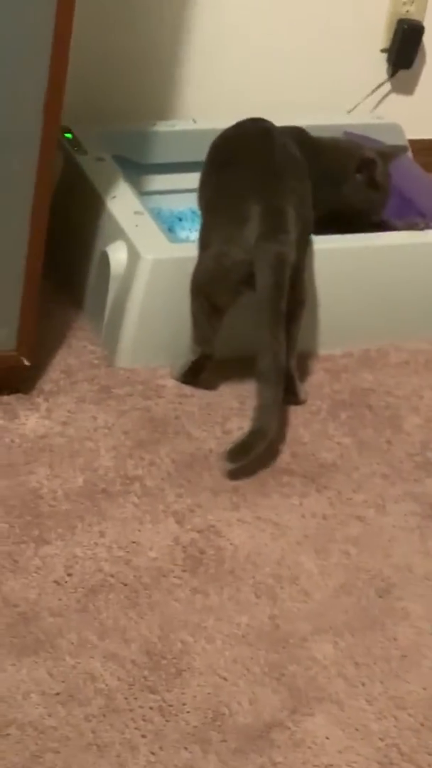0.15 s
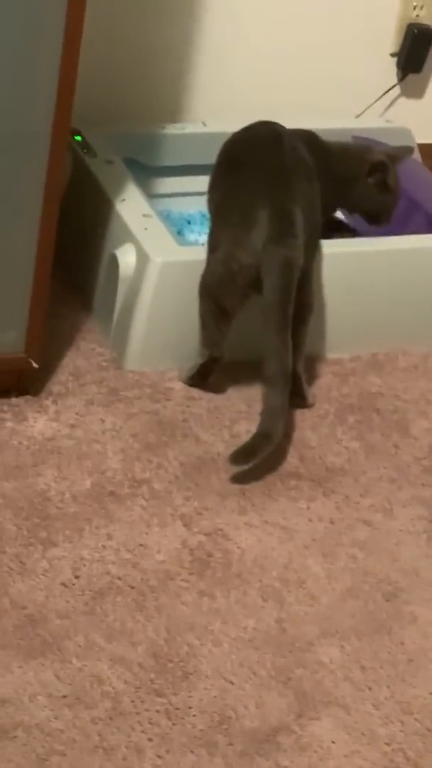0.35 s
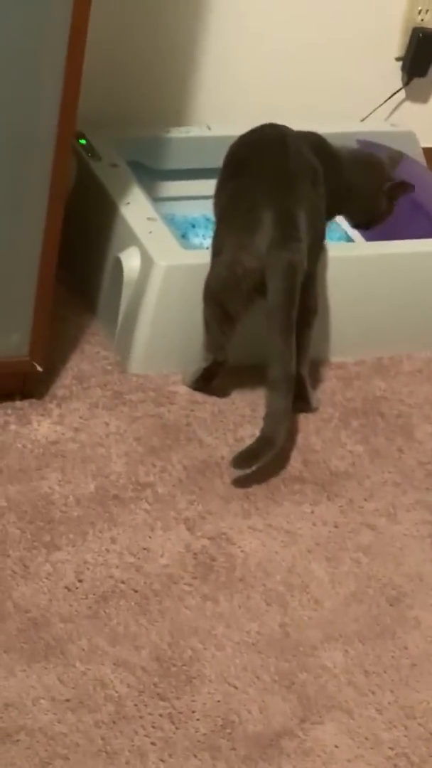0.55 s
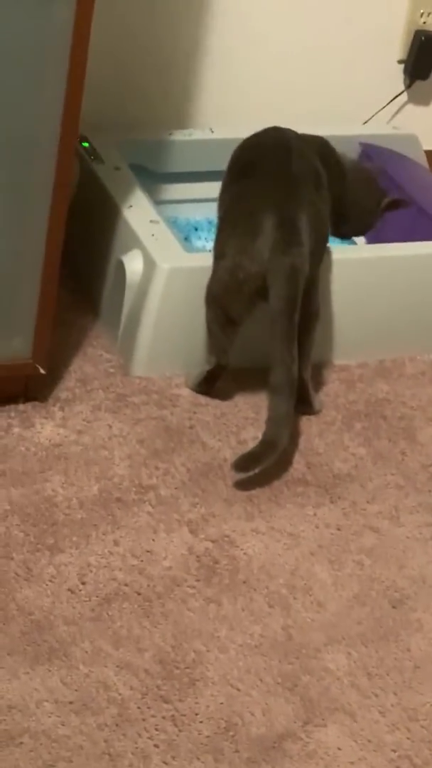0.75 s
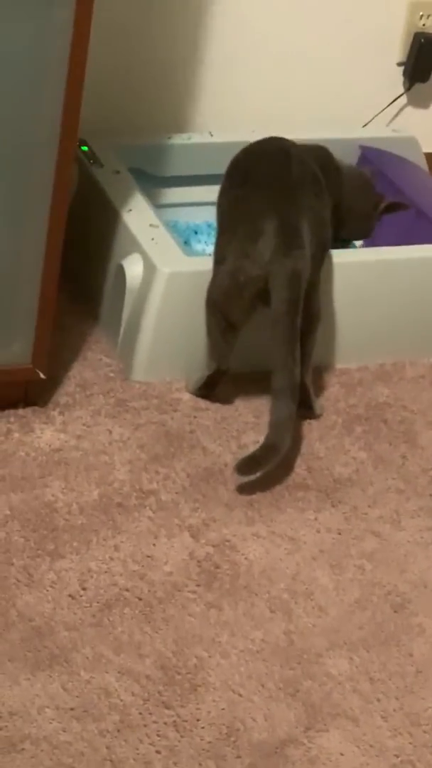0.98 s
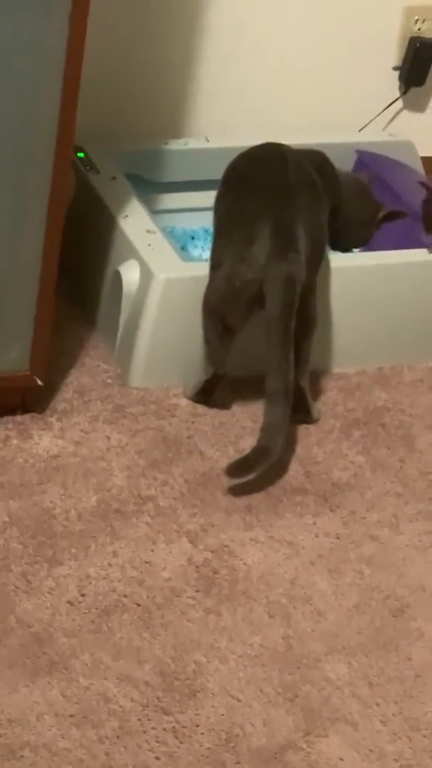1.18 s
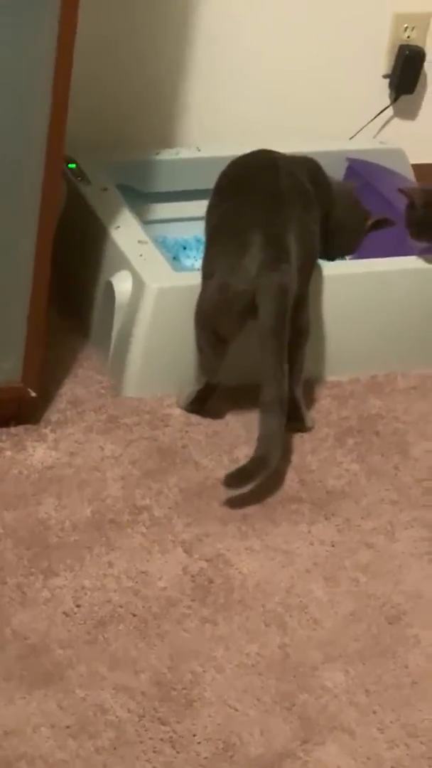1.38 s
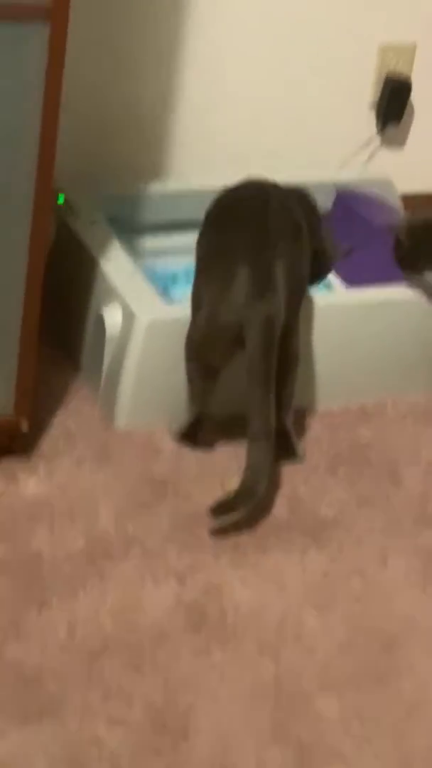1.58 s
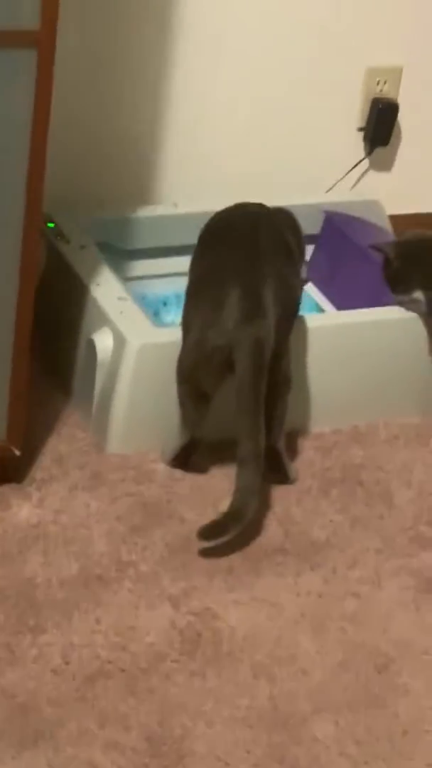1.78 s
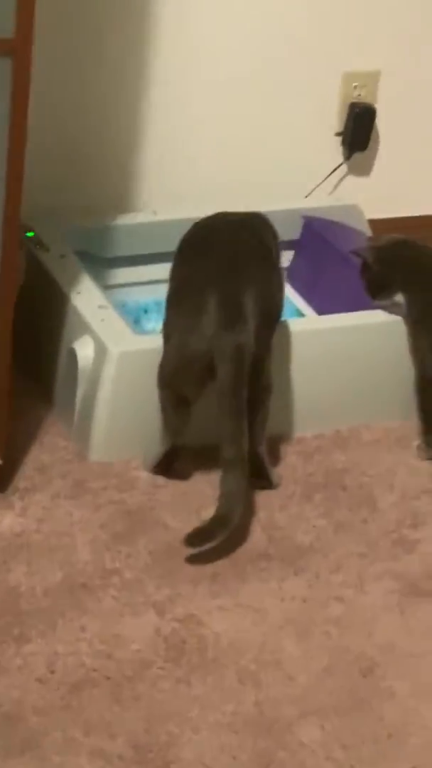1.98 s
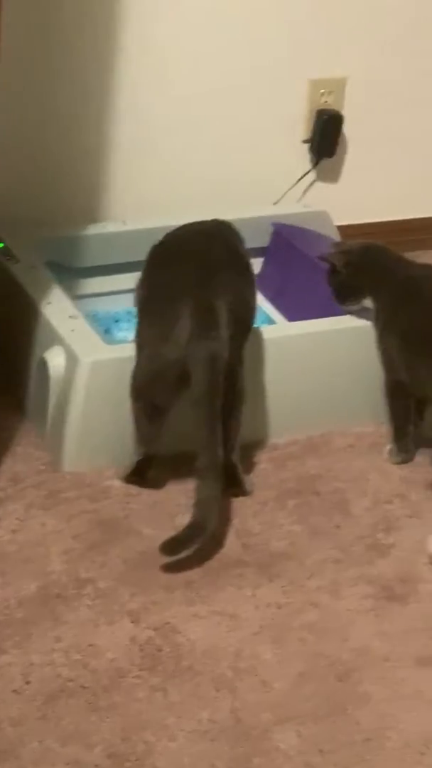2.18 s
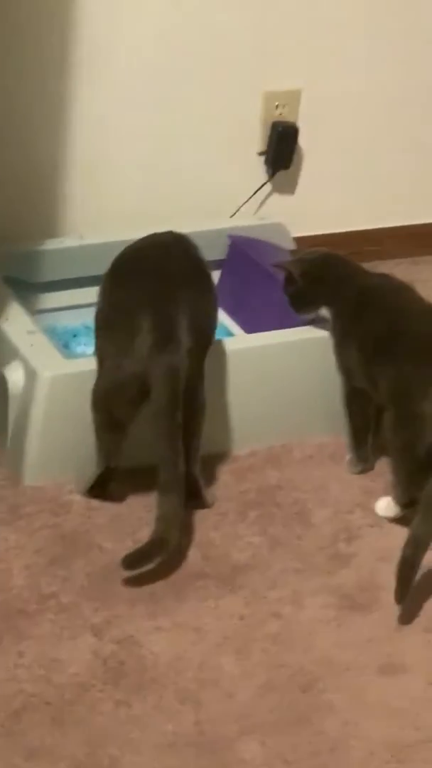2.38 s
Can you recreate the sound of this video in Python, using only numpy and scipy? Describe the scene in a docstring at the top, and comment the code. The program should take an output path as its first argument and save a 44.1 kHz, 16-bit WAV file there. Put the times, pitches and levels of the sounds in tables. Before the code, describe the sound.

Gritty litter crystals scrape and rattle under a cat's paw in a humming room.

```python
"""Small carpeted room: a couple of metres away, a cat paws at crystal litter in a plastic box.
A few light touches scatter crystals, then come a short hard scrape, a longer sweep and a faint touch.
Colliding crystals click; in the two strokes the clicks ring the box, and claws knock its wall.
Mains hum and a low rumble run throughout."""
import sys
import numpy as np
from scipy import signal
from scipy.fft import rfft, irfft
from scipy.io import wavfile

SR = 44100
rng = np.random.default_rng(int(sys.argv[2]) if len(sys.argv) > 2 else 0)


def file_out(sig):
    """Save sig as 16-bit WAV at sys.argv[1]."""
    # one column per channel
    cols = np.atleast_2d(sig).T
    # limit, then scale
    lim = np.clip(cols, -1, 1)
    pcm = np.round(lim * 32767).astype(np.int16)
    wavfile.write(sys.argv[1], SR, pcm)


N = 112014
HZ = np.fft.rfftfreq(N, 1 / SR)
TIME = np.arange(N) / SR


def amp(db):
    """Decibels to gain."""
    return 10 ** (np.asarray(db) / 20)


def unit_rms(x):
    """Scale to rms 1."""
    return x / np.sqrt(np.mean(abs(x) ** 2) + 1e-20)


def curve_at(points, hz):
    """Interpolate a table over log frequency."""
    freq_hz, value = np.transpose(points)
    return np.interp(np.log(hz + 1), np.log(freq_hz), value)


def drift(rate_hz):
    """Slow random motion, rms 1."""
    return unit_rms(irfft(rfft(rng.standard_normal(N)) * np.exp(-(HZ / rate_hz) ** 2), N))


# freq_hz, density_db
RUMBLE_SPECTRUM = [(10, -31), (22, -38), (32, -9.5), (48, -1.5), (62, 6.5), (80, -9), (97, 0), (135, -6.5),
                   (165, -6.5), (245, -9.5), (320, -12.5), (430, -19), (680, -23.5), (850, -20),
                   (1100, -29), (1400, -22.5), (2000, -35.5), (3000, -43.5), (7000, -52), (9000, -48),
                   (15000, -51)]

def rumble(level_db=-54, swell_db=2.53, swell_hz=11):
    """Low room noise, each octave swelling on its own, under a faint steady hiss."""
    noise = unit_rms(irfft(rfft(rng.standard_normal((2, N))) * amp(curve_at(RUMBLE_SPECTRUM, HZ)), N))
    spectrum = rfft(noise)
    octave = np.log2(np.clip(HZ, 2 ** 5, 2 ** 12))
    out = np.zeros((2, N))
    for k in range(5, 13):
        band = irfft(spectrum * np.maximum(1 - abs(octave - k), 0), N)
        out += band * amp(level_db + swell_db * drift(swell_hz) * (k < 12))
    return out


# pitch_hz, relative_db
HUM_LINES = [(60, -20), (120, 0), (240, -15.5), (557, -28.5)]
# time_s, level_db
HUM_ENVELOPE = [(0.0, -51), (0.54, -52), (0.57, -55.5), (0.8, -49), (0.83, -53.5), (1.51, -49.5),
                (1.56, -58), (1.6, -47), (1.65, -63), (1.68, -53), (1.85, -48), (1.92, -56.5), (2.21, -51),
                (2.23, -54), (2.48, -49), (2.54, -50.5)]
# freq_hz, left_minus_right_db (also used by microphones)
BALANCE = [(30, -2), (60, 0.5), (120, -4.5), (220, -4), (380, -1.5), (700, 2.5), (1500, -0.6), (3000, 0.2),
           (4100, 0.2), (6000, -3), (8000, -0.2), (15000, -0.5)]

def hum(waver_db=0.84, waver_rad=0.74, waver_hz=14, left_lag_rad=0.44):
    """Mains hum of an appliance, slightly right; level and phase waver."""
    out = np.zeros((2, N))
    swell_db = np.interp(TIME, *np.transpose(HUM_ENVELOPE))
    sides = np.array([[.5], [-.5]])
    for hz, db in HUM_LINES:
        phase = 2 * np.pi * (hz * TIME + rng.random()) + waver_rad * drift(waver_hz)
        level = amp(swell_db + db + waver_db * drift(waver_hz) + sides * curve_at(BALANCE, hz))
        out += np.sqrt(2) * level * np.sin(phase - sides * left_lag_rad)
    return out


def crystals(clicks_per_s, spread_db=2):
    """Crystals collide: random clicks of uneven size."""
    size = amp(spread_db * np.minimum(rng.exponential(1, N), 4))
    return unit_rms(size * rng.choice([-1., 1.], N) * (rng.random(N) < clicks_per_s / SR))


def treble_shelf(x, treble_db, corner_hz=6500):
    """High shelf; the gain may vary in time."""
    treble = irfft(rfft(x) * (1 - 1 / (1 + (HZ / corner_hz) ** 4)), N)
    return x + treble * (amp(treble_db) - 1)


# start_s, rise_s, length_s, level_db, treble_db
PAW_TOUCHES = [(0.021, 0.0012, 0.014, -52, 1), (.112, 0.0055, 0.016, -63, -9),
               (0.165, 0.0073, 0.025, -49, -9.5), (0.21, 0.0052, 0.027, -57, -24),
               (0.242, .002, 0.0045, -49, -8.5), (0.251, 0.007, 0.03, -49.5, -18),
               (2.067, 0.014, 0.015, -72, -12)]
# freq_hz, density_db
TOUCH_SPECTRUM = [(150, -27), (500, -6), (850, -9.5), (1200, -8.5), (2500, -7), (3700, -6.5), (4500, -12.5),
                  (7300, -13.5), (9000, -9.5), (14000, -12), (16000, -18)]

def touches(fall_s=0.0067, crack_db=0.5, crack_s=0.0028):
    """Light paw touches: the first crystals crack loudest, then a few tumble."""
    clicks = np.zeros(N)
    for start_s, rise_s, length_s, level_db, treble_db in PAW_TOUCHES:
        t = TIME - start_s
        tumble = np.clip(t / rise_s, 0, 1) * np.exp(-np.maximum(t - length_s, 0) / fall_s)
        crack = 1 + amp(crack_db) * np.exp(-abs(t) / crack_s)
        clicks += treble_shelf(crystals(clicks_per_s=2000) * tumble * crack * amp(level_db), treble_db)
    return irfft(rfft(room(clicks)) * unit_rms(amp(curve_at(TOUCH_SPECTRUM, HZ))), N)


# pitch_hz, t60_s, scrape_db, sweep_db
BOX_MODES = [(520, .13, -8, 2), (1005, .2, 9, 4), (1230, .15, 6, -2), (1485, .15, 3, 4), (1822, .3, -5, 9),
             (1986, .22, -5, 8), (2372, .16, -6, 5), (2590, .14, 10, -8), (2940, .12, -10, 0),
             (3020, .13, 6, -12), (3280, .12, 2, -2), (3850, .12, 0, -7)]

def box_response(spot):
    """Modes of the plastic walls, driven at spot 0 (scrape) or 1 (sweep)."""
    return sum(amp(levels_db[spot]) / (1 + 1j * (HZ - hz) * 2 * np.pi * t60_s / np.log(1000))
               for hz, t60_s, *levels_db in BOX_MODES)


def paw_drag(pressure, spectrum, spot, body_rise_s, body_hz=2060, ring_db=-5):
    """Dense clicks ring the box; their low body builds as the paw sinks in."""
    time_s, level_db, treble_db = np.transpose(pressure)
    level = amp(np.interp(TIME, time_s, level_db)) * (TIME > time_s[0]) * (TIME < time_s[-1])
    clicks = treble_shelf(crystals(clicks_per_s=16000) * level, np.interp(TIME, time_s, treble_db))
    body = irfft(rfft(clicks) / (1 + (HZ / body_hz) ** 8), N)
    depth = np.clip((TIME - time_s[0]) / body_rise_s, 0, 1) ** 2
    clicks -= body * (1 - depth)
    colour = amp(curve_at(spectrum, HZ)) * (1 + amp(ring_db) * box_response(spot))
    return irfft(rfft(room(clicks)) * unit_rms(colour), N)


# time_s, level_db, treble_db
SCRAPE_PRESSURE = [(.305, -63, -2), (.321, -41, -14), (.328, -38, -2), (.338, -43.5, 6), (.346, -39.5, 3),
                   (.372, -38, -1), (.399, -39.5, -14), (.41, -52, 12.5), (.45, -61, -10), (.52, -76, -12)]
# freq_hz, density_db
SCRAPE_SPECTRUM = [(200, -26), (750, -19), (1050, -7.5), (2100, -2.5), (2700, 0.5), (3800, 1), (4600, -9),
                   (5800, -10), (7400, -19.5), (9000, -14), (14000, -21.5), (16000, -23)]

def scrape():
    """Short hard drag through the litter."""
    return paw_drag(SCRAPE_PRESSURE, SCRAPE_SPECTRUM, spot=0, body_rise_s=0.052)


# start_s, level_db, pitch_hz
CLAW_KNOCKS = [(.346, -38, 3050), (.373, -31, 2640), (1.263, -44, 1990), (1.317, -45.5, 1774)]

def knocks(rise_s=0.004, spread_octaves=0.15):
    """A claw strikes the wall; modes near that spot's pitch ring on."""
    out = np.zeros((2, N))
    for start_s, level_db, pitch_hz in CLAW_KNOCKS:
        t = np.maximum(TIME - start_s, 0)
        for hz, t60_s, *_ in BOX_MODES:
            share = np.exp(-(np.log2(hz / pitch_hz) / spread_octaves) ** 2)
            if share > .05:
                swing = np.sin(2 * np.pi * (hz * t + rng.random((2, 1))))
                out += share * amp(level_db - 60 * t / t60_s) * np.minimum(t / rise_s, 1) * swing
    return out


# time_s, level_db, treble_db
SWEEP_PRESSURE = [(1.075, -76, -15), (1.1, -56, -12), (1.125, -48.5, -8), (1.148, -57, 2),
                  (1.158, -48, -1.5), (1.215, -47.5, 0.5), (1.252, -43, 1.5), (1.266, -39.5, -7),
                  (1.288, -50.5, 6.5), (1.32, -46.5, 1.5), (1.365, -51, 1), (1.41, -74, 14),
                  (1.46, -77.5, 6), (1.56, -82.5, 8.5)]
# freq_hz, density_db
SWEEP_SPECTRUM = [(150, -22), (500, -4), (700, -6), (1100, -2.5), (1800, 0.5), (3100, 3.5), (4700, -4.5),
                  (7400, -8), (9000, -7.5), (13000, -12), (16000, -21)]

def sweep():
    """Longer, softer drag through the litter."""
    return paw_drag(SWEEP_PRESSURE, SWEEP_SPECTRUM, spot=1, body_rise_s=0.011)


def early_reflections(x, count=12, span_s=0.012):
    """First returns from the box and the wall behind it."""
    out = np.zeros((2, N))
    for side in out:
        for when, sign in rng.random((count, 2)):
            lag = round(when * span_s * SR)
            side[lag:] += np.sign(sign - .5) * x[:N - lag] / np.sqrt(count)
    return out


# freq_hz, t60_s
ROOM_DECAY = [(200, 0.12), (1000, .38), (3000, 0.29), (6000, .3), (10000, 0.18), (16000, 0.25)]

def reverb(x, taps_per_s=5000):
    """Two independent tails of sparse reflections; each band decays at its own rate."""
    taps = rng.choice([-1., 1.], (2, SR // 2)) * (rng.random((2, SR // 2)) < taps_per_s / SR)
    hz, t, bands = signal.stft(taps, SR, nperseg=256)
    decay = amp(-60 * t / curve_at(ROOM_DECAY, hz)[:, None])
    tail = signal.istft(bands * decay, SR, nperseg=256)[1]
    tail /= np.linalg.norm(tail, axis=1, keepdims=True)
    return signal.fftconvolve(x[None], tail, axes=1)[:, :N]


def room(x, direct_db=-6, early_db=-8.5, crossfade_hz=9):
    """Direct sound plus two reflection sets, steadily crossfaded for an even tail; returns mid, side."""
    angle = 2 * np.pi * crossfade_hz * TIME
    sends = x * np.cos(angle), x * np.sin(angle)
    wet = sum(reverb(send) + amp(early_db) * early_reflections(send) for send in sends)
    return wet + amp(direct_db) * np.array([x, np.zeros(N)])


# freq_hz, left_lead_rad
MIC_PHASE = [(0, 0), (180, -.2), (700, 1.8), (1100, 1.7), (1350, 2.6), (1800, 6.3), (2400, 8.5),
             (3000, 9.3), (3600, 9.7), (4100, 11.7), (4400, 11.7), (4900, 14.5), (5400, 16.3), (6400, 16.4),
             (6900, 15.7), (16100, 3.14)]
# freq_hz, coherence
MIC_COHERENCE = [(60, 0.96), (150, 0.74), (350, 0.42), (750, 0.13), (1050, 0.29), (1700, 0.16),
                 (2400, 0.13), (3100, 0.35), (4000, 0.13), (6000, 0.13), (7200, 0.64), (9200, 0.84),
                 (10300, 0.43), (11500, 1), (12800, 1), (14000, 1)]

def microphones(mid_side):
    """Mid and side to left and right, which differ in phase and level."""
    mid, side = rfft(mid_side)
    coherence = np.clip(curve_at(MIC_COHERENCE, HZ), 0, 1)
    mid *= np.sqrt((1 + coherence) / 2)
    side *= np.sqrt((1 - coherence) / 2)
    lead_rad = np.interp(HZ, *np.transpose(MIC_PHASE))
    pan = np.exp(.5j * lead_rad) * amp(curve_at(BALANCE, HZ) / 2)
    return irfft(np.array([(mid + side) * pan, (mid - side) / pan]), N)


def scene():
    """The cat digs in the humming room."""
    litter = touches() + scrape() + sweep()
    return microphones(litter + rumble() + knocks()) + hum()


def record(dry):
    """Low-pass at 15.9 kHz."""
    lowpass = signal.firwin(511, 15900, window=("kaiser", 9), fs=SR)
    return signal.oaconvolve(dry, lowpass[None], "same")


dry = scene()
out = record(dry)
file_out(out)
```